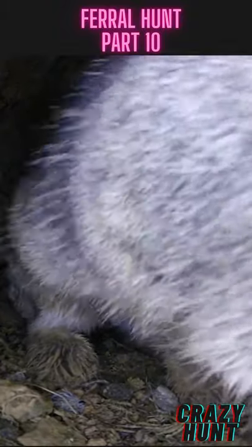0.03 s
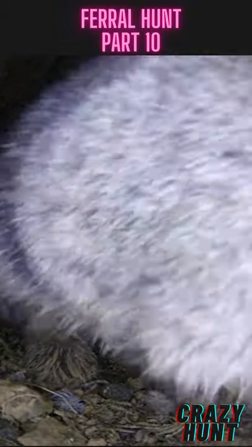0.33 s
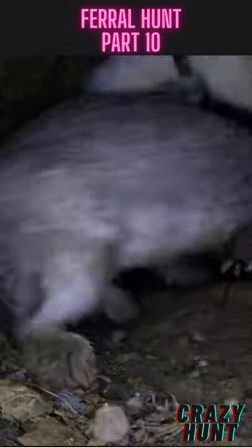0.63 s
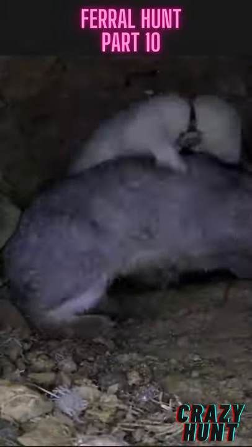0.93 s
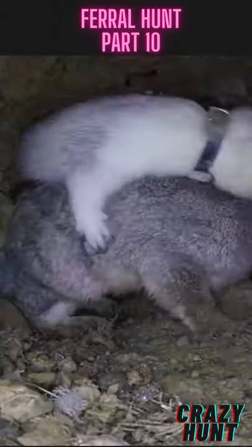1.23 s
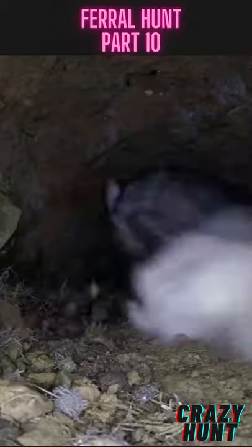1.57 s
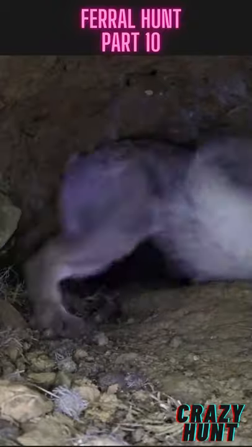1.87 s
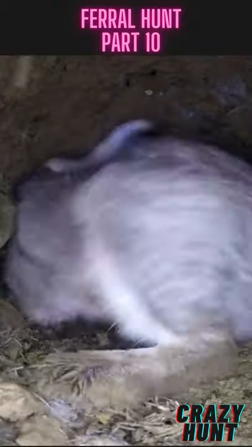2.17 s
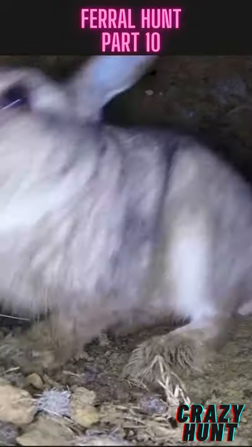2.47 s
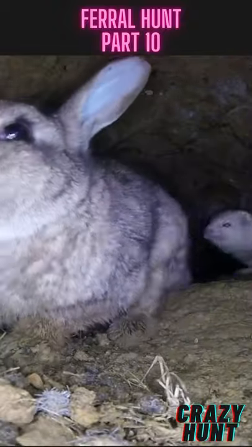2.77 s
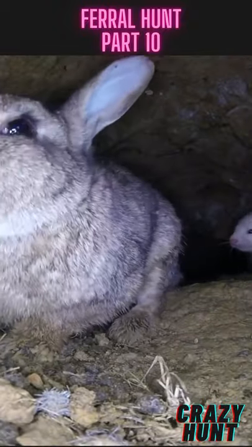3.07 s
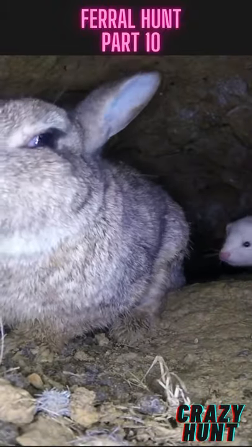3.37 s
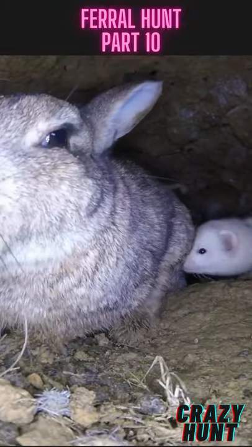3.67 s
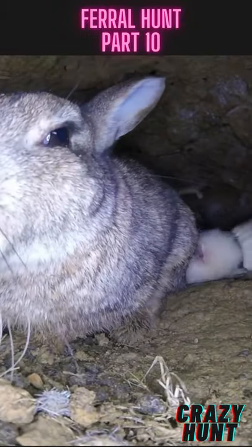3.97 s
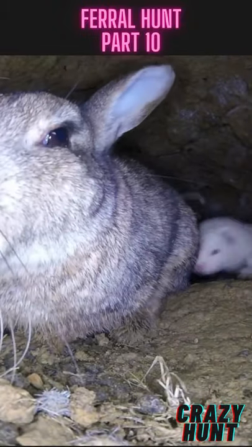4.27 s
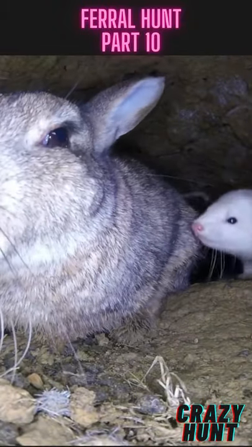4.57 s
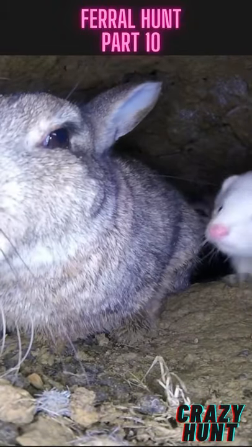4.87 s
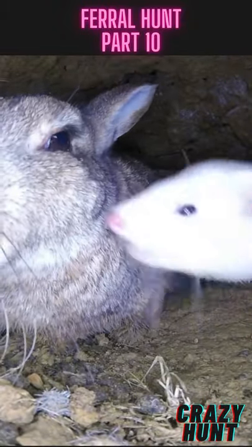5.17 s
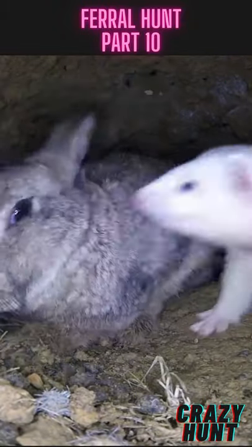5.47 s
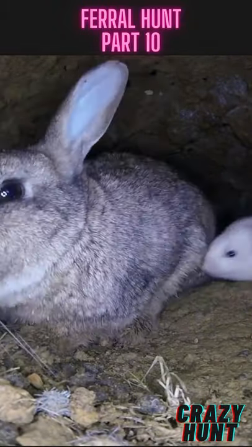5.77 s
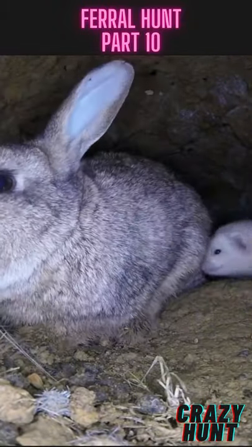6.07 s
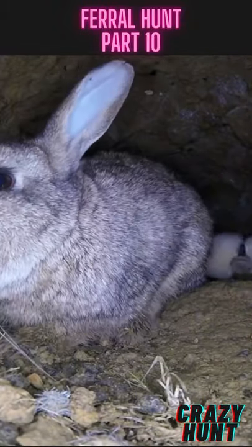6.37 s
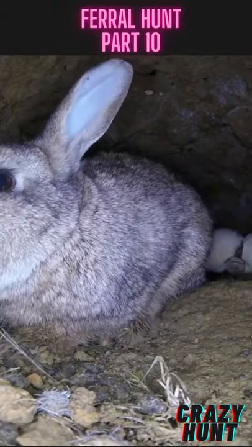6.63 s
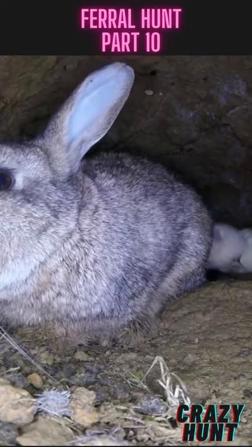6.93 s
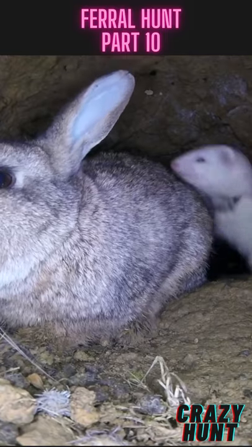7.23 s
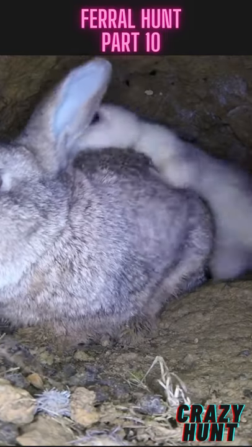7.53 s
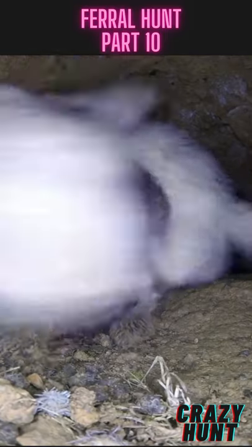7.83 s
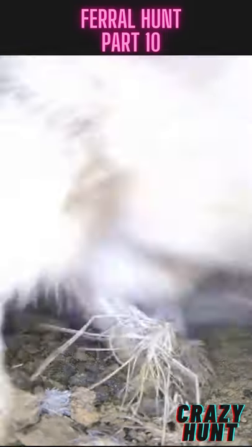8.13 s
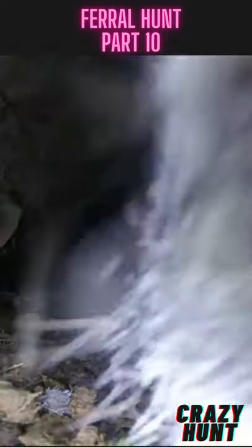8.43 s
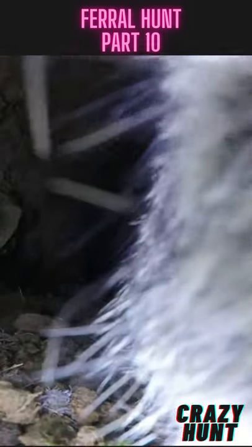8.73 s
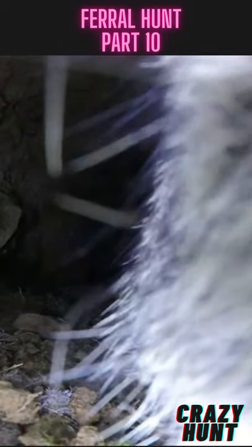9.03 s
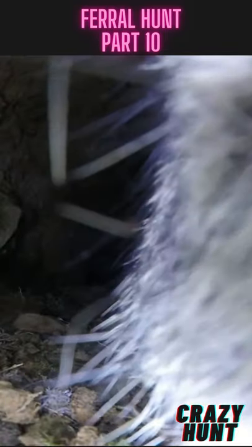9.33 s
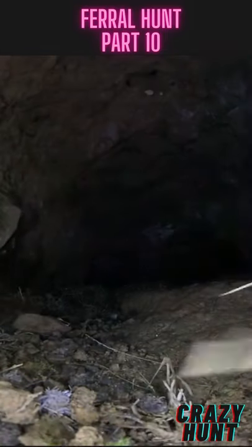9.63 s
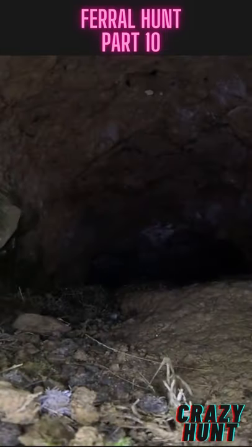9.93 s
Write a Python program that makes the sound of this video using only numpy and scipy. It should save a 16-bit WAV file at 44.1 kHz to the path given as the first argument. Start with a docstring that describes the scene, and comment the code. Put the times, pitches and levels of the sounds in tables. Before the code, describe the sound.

Two animals scuffle in an earth burrow, with close dull thumps, sharp knocks and gritty scrapes, pausing midway over a low rumble.

```python
"""Scuffle in a burrow

A ferret and a rabbit scuffle in an earth burrow, right beside a small camera. Feet and bodies thud on
the soil, claws and pebbles click, and bumps set the hollow case ringing. Friction makes grit scrape and
fur swish over the microphone. In the lull come faint sniffs, and the ferret noses about with two squeaks.
Under it all lie a low rumble, a faint hum and hiss."""
import sys
import numpy as np
from scipy import signal
from scipy.fft import rfft, irfft
from scipy.io import wavfile

SR = 44100
rng = np.random.default_rng(int(sys.argv[2]) if len(sys.argv) > 2 else 0)


def dump_mix(stems):
    """Bounce the given channels to the path in sys.argv[1] as a 16-bit WAV at rate SR."""
    frames = np.atleast_2d(stems).T  # one column per channel
    limited = np.clip(frames, -1, 1)  # hard clip at full scale
    pcm = np.round(limited * 32767).astype(np.int16)
    wavfile.write(sys.argv[1], SR, pcm)


N = 441000
TIME = np.arange(N) / SR

# how hard the animals move, as the level of the shaking ground: time_s, level_db
EFFORT = [(0.0, -46.5), (0.47, -44.5), (0.7, -36.5), (1.31, -42), (1.67, -38.5), (2.03, -35), (2.3, -39.5),
          (2.45, -49.5), (2.7, -49), (3.2, -55), (5.18, -52), (5.48, -46.5), (7.04, -53.5), (7.5, -49),
          (7.75, -42.5), (7.9, -41.5), (8.02, -29), (8.17, -36.5), (8.28, -45.5), (8.42, -42), (8.66, -53),
          (8.91, -55.5), (9.11, -51.5), (9.78, -51.5), (10.0, -54.5)]
# spectrum of scraped grit: frequency_hz, gain_db
GRIT_SPECTRUM = [(100, -18.5), (300, 15.5), (700, 6.5), (1400, 3.5), (2500, -0.5), (2900, 0.5), (3300, 0),
                 (4000, -0.5), (5600, -2), (6500, 3), (7500, -7), (10000, -16), (14000, -27)]


def amp(db):
    """Amplitude grows tenfold for every 20 decibels."""
    return 10 ** (np.asarray(db) / 20)


def unit(x):
    """Normalisation to an rms of 1."""
    return x / np.sqrt(np.mean(x ** 2) + 1e-20)


def level(curve):
    """An amplitude envelope, interpolated in decibels from rows of time_s, level_db."""
    return amp(np.interp(TIME, *np.transpose(curve)))


def add(mix, start_s, sound):
    """Superposition: a sound sums into the mix from its start time."""
    part = mix[max(round(start_s * SR), 0):][:len(sound)]
    part += sound[:len(part)]


def coloured(x, spectrum):
    """Spectral shaping by rows of frequency_hz, gain_db, at rms 1."""
    hz, db = np.transpose(spectrum)
    bins = np.fft.rfftfreq(len(x), 1 / SR)
    gain = amp(np.interp(np.log(bins + 1), np.log(hz), db))
    return unit(irfft(rfft(x) * gain, len(x)))


def drift(rate_hz):
    """Random modulation: noise low-passed near the given rate, at rms 1."""
    bins = np.fft.rfftfreq(N, 1 / SR)
    return unit(irfft(rfft(rng.standard_normal(N)) * np.exp(-(bins / rate_hz) ** 2), N))


def contact(hz, octaves, size=2048):
    """An impact as a minimum-phase pulse, its energy in a hump around hz."""
    bins = abs(np.fft.fftfreq(size, 1 / SR)) + 1
    distance = np.log2(bins / hz) / max(octaves, .1)
    log_gain = np.maximum(2 - 2 * np.sqrt(1 + distance ** 2 / 2), -11)
    spectrum = np.exp(np.conj(signal.hilbert(log_gain)))
    return np.fft.ifft(spectrum).real[:size // 2]


def excite(force, response):
    """A linear system convolves the force with its impulse response; scaled to rms 1."""
    return unit(signal.fftconvolve(force, response)[:len(force)])


def damped_modes(modes, t):
    """Free vibration: one exponentially decaying sinusoid for each mode."""
    return [amp(db - 60 * t / t60) * np.sin(2 * np.pi * hz * t) for hz, db, t60 in modes]


def resonate(x, hz, width_hz):
    """A steep resonance whose centre follows the curve hz, at rms 1."""
    carrier = np.exp(2j * np.pi * np.cumsum(hz) / SR)
    pole = np.exp(-np.pi * width_hz / SR)
    baseband = signal.lfilter([1], np.poly([pole, pole]), x / carrier)
    return unit((carrier * baseband).real)


def background(hiss_db=-57.5, waver_rad=0.2):
    """Hiss coloured by the microphone's narrow resonance, and a faint phase-modulated hum."""
    # frequency_hz, gain_db
    hiss_spectrum = [(100, 8.5), (330, 14), (600, 6.5), (1200, 4), (2000, 0.5), (3200, -4), (4500, -14),
                     (5900, -9), (6480, 8), (7100, 0.5), (8800, -2.5), (10300, -11), (12000, -7.5),
                     (14000, -18)]
    # frequency_hz, level_db
    hum_partials = [(724, -78), (844.6, -75), (965.2, -80), (1206.3, -84)]
    # both sink after the heaviest blows and creep back: time_s, gain_db
    dips = [(0, -0.5), (1.59, -2.5), (1.65, -11.5), (2.9, -9), (4.2, -4.5), (5.6, -3), (7.95, -2),
            (8.15, -5.5), (8.3, -12), (9.0, -9), (10, -6)]
    hiss = amp(hiss_db) * coloured(rng.standard_normal(N), hiss_spectrum)
    hum = sum(amp(db) * np.sqrt(2) * np.sin(2 * np.pi * hz * TIME + waver_rad * drift(4))
              for hz, db in hum_partials)
    return (hiss + hum) * level(dips)


def rumble(gain_db=3, lump_db=2.5, lump_hz=6.5):
    """Forced vibration: shifting weight shakes the ground in uneven lumps."""
    # frequency_hz, gain_db
    ground_spectrum = [(15, -9.5), (30, 6.5), (58, 4), (90, -6.5), (140, -6.5), (200, -16), (320, -28),
                       (500, -38.5), (1200, -54.5), (4000, -82.5)]
    shaking = coloured(rng.standard_normal(N), ground_spectrum)
    return shaking * level(EFFORT) * amp(gain_db + lump_db * drift(lump_hz))


def nosing(start_s=4.95, length_s=1.55, level_db=-67.5, band_hz=(1040, 1320)):
    """Narrow-band noise swells once while the ferret noses about."""
    swell = np.zeros(N)
    add(swell, start_s, amp(level_db) * signal.windows.hann(int(length_s * SR)))
    bandpass = signal.butter(2, band_hz, "bandpass", fs=SR, output="sos")
    return swell * unit(signal.sosfilt(bandpass, rng.standard_normal(N)))


def sniffing(grain_db=3, grain_hz=150):
    """An animal sniffs: faint, short puffs of breath noise, made grainy by amplitude modulation."""
    # start_s, length_s, level_db
    sniffs = [(3.47, 0.088, -77), (3.759, .11, -72), (4.078, 0.085, -71), (4.387, 0.11, -69),
              (4.64, 0.15, -68), (4.99, 0.057, -69.5), (5.924, .11, -71), (6.145, 0.082, -67),
              (6.272, 0.086, -72), (7.187, .08, -71)]
    # frequency_hz, gain_db
    sniff_spectrum = [(500, -16), (1500, -14), (2500, -2), (3400, 1.5), (4300, -2), (5500, -6), (8000, -16),
                      (14000, -33)]
    swell = np.zeros(N)
    for start_s, length_s, db in sniffs:
        add(swell, start_s, amp(db) * signal.windows.hann(int(length_s * SR)))
    breath = coloured(rng.standard_normal(N), sniff_spectrum)
    return swell * breath * unit(amp(grain_db * drift(grain_hz)))


def squeaks(arch=0.07, width_hz=520):
    """The ferret's rough squeaks: a noise-driven resonance arches up in pitch and eases back."""
    # start_s, length_s, top_pitch_hz, level_db
    calls = [(5.385, 0.044, 5100, -63), (6.533, 0.03, 5200, -70)]
    out = np.zeros(N)
    for start_s, length_s, top_hz, db in calls:
        progress = np.linspace(0, 1, int(length_s * SR))
        pitch = top_hz * (1 - arch * (1 - np.sin(np.pi * progress * 3 / 4)))
        noise = rng.standard_normal(SR)[:len(progress)]
        add(out, start_s, amp(db) * np.sin(np.pi * progress) * resonate(noise, pitch, width_hz))
    return out


def fur(flutter_db=2, flutter_hz=73):
    """Friction noise: countless hairs slide over the microphone and sum to a soft swish."""
    # start_s, length_s, level_db
    sweeps = [(8.351, 0.064, -38), (8.391, 0.19, -45.5), (9.474, 0.28, -48.5)]
    # frequency_hz, gain_db
    fur_spectrum = [(100, 22), (300, 8.5), (700, 6), (1100, 3.5), (1700, 3), (2500, -6), (4000, -9),
                    (6500, -11.5), (9000, -19), (14000, -47)]
    stroke = np.zeros(N)
    for start_s, length_s, db in sweeps:
        add(stroke, start_s, amp(db) * signal.windows.tukey(int(length_s * SR), alpha=0.65))
    swish = coloured(rng.standard_normal(N), fur_spectrum)
    return stroke * swish * amp(-flutter_db * drift(flutter_hz))


def dragging(attack_s=0.021, release_s=0.0054):
    """The envelope of sliding friction: a paw bites into grit, presses on or eases, and stops."""
    # start_s, length_s, midway_level_db, growth_db
    drags = [(0.616, 0.1, -57, -23), (0.735, 0.077, -54.5, -7), (0.83, 0.11, -70, 5), (0.98, 0.19, -63, -1),
             (1.04, 0.036, -63, -6), (1.187, 0.095, -71, -4), (1.339, 0.064, -55, -14),
             (1.423, 0.16, -56.5, 6.5), (1.643, 0.025, -47, -33), (1.707, 0.094, -72, 6),
             (1.991, 0.035, -56.5, -3), (2.042, 0.105, -52.5, -1), (2.145, 0.081, -58, 8),
             (2.229, 0.19, -63.5, -9), (2.414, 0.12, -63.5, -7), (2.55, 0.038, -60, -7.5),
             (2.766, 0.11, -64, -5.5), (5.23, 0.07, -64, 2), (5.4, 0.33, -67.5, -3),
             (5.884, 0.41, -73.5, 9.5), (7.42, 0.1, -64.5, 8), (7.67, 0.057, -58.5, 9),
             (7.925, 0.081, -52, 14.5), (8.011, 0.1, -53.5, -14), (8.075, 0.027, -45, 1),
             (8.103, 0.055, -42, 12.5), (8.2, 0.036, -60, -21), (8.362, 0.16, -54, 5),
             (8.648, 0.089, -66, -5.5)]
    out, t = np.zeros(N), np.arange(SR) / SR
    for start_s, length_s, db, growth_db in drags:
        slide = amp(db + growth_db * (np.minimum(t / length_s, 1) - .5))
        attack = np.minimum(t / attack_s, 1)
        release = np.exp(-np.maximum(t - length_s, 0) / release_s)
        add(out, start_s, slide * attack * release)
    return out


def scrape(grains_per_s=750, size_db=1.5, clump_db=2, clump_hz=35, gain_db=-1.44):
    """Shot noise: grains of soil snap in clumps under the paws, over the smooth rub of fur on earth."""
    sizes = amp(size_db * np.minimum(rng.exponential(1, N), 4)) * rng.choice([-1, 1], N)
    grains = unit(sizes * (rng.random(N) < grains_per_s / SR))
    rub = rng.standard_normal(N)
    force = (grains + rub) * amp(clump_db * drift(clump_hz))
    stirring = amp(-39) * level(EFFORT) ** 0.62  # loose grit stirs all the time, more with effort
    return coloured(force, GRIT_SPECTRUM) * (dragging() + stirring) * amp(gain_db)


def crumbs(snaps_per_s=260, size_count=8, spread_db=7.5, gain_db=-8):
    """A Poisson process: coarse crumbs snap singly under dragging paws, each size at its own pitch."""
    out = np.zeros(N)
    for hz in np.geomspace(1780, 5600, size_count):
        snaps = rng.random(N) < snaps_per_s / size_count / SR
        strength = amp(spread_db * rng.uniform(-1.1, 1, N))
        out += signal.oaconvolve(snaps * strength, unit(contact(hz, octaves=.6)))[:N]
    return amp(gain_db) * coloured(out, GRIT_SPECTRUM) * dragging()


def rasps(stutter_db=4, stutter_hz=260):
    """Stick-slip friction: claws and flanks catch and slip, exciting a resonance that glides."""
    # start_s, length_s, level_db, centre_hz, width_hz, glide_octaves
    slides = [(1.732, 0.16, -59.5, 470, 203, 0.1), (2.043, 0.035, -51.5, 5600, 1100, -.15),
              (2.067, 0.024, -46, 1120, 450, .1), (2.44, 0.047, -61, 4300, 2000, 0.14),
              (2.627, 0.032, -70, 3850, 700, -.1), (6.39, 0.079, -51.5, 258, 200, -0.22),
              (6.419, 0.023, -52, 443, 159, -0.079), (7.929, 0.035, -51, 2780, 603, 0.03),
              (7.952, 0.032, -55, 3200, 1200, .25), (8.128, 0.04, -41, 6500, 1100, .02),
              (8.452, 0.059, -48.5, 1490, 600, .1), (8.49, 0.046, -51, 1530, 300, 0.058),
              (9.53, 0.15, -60.5, 1650, 600, -.1)]
    out = np.zeros(N)
    slips = rng.standard_normal(N) * amp(stutter_db * drift(stutter_hz))
    for start_s, length_s, db, hz, width_hz, glide in slides:
        progress = np.linspace(0, 1, int(length_s * SR))
        force = slips[int(start_s * SR):][:len(progress)]
        band = resonate(force, hz * 2 ** (glide * (progress - .5)), width_hz)
        add(out, start_s, amp(db) * np.sin(np.pi * progress) * band)
    return out


def bumps(rise_s=0.001):
    """Modal ringing: a body bumps the camera's hollow case, which booms under weaker upper modes."""
    # start_s, level_db, upper_modes_db
    hits = [(8.3613, -36, 3), (8.3767, -14.5, -0.5), (8.4083, -23.5, -12)]
    # frequency_hz, gain_db, t60_s
    case_modes = [(246, 2, 0.054), (588, -22, 0.096), (953, -13, .05), (1172, -22, 0.084),
                  (1600, -14.5, 0.029), (1970, -29, .06)]
    out, t = np.zeros(N), np.arange(SR // 5) / SR
    lowest, *upper = damped_modes(case_modes, t)
    rise = 1 - np.exp(-t / rise_s)
    for start_s, db, upper_db in hits:
        add(out, start_s, -amp(db) * rise * (lowest + amp(upper_db) * sum(upper)))
    return out


def knocks(crumble=0.32, shove_db=-11.5, shove_hz=380, wall_db=-12, wall_decay_s=.0025):
    """Impact excitation: claws and pebbles strike, ring, shove the camera and scatter off the walls."""
    # start_s, level_db, centre_hz, spread_octaves, crumble_s, ring_db
    impacts = [(0.535, -44, 990, 0.33, 0.0034, -18), (0.6268, -33.5, 6300, 1.1, 0.00025, -25),
               (0.747, -34.5, 2220, 0.62, 0.0035, -14), (0.7492, -37.5, 420, 0.66, 0.0018, -2),
               (0.8715, -54, 4000, 0.73, .0006, -14), (0.949, -56, 4500, .6, .0006, -14),
               (0.992, -52, 2500, 0.71, 0.0011, -10), (1.061, -51, 4000, 0.89, .002, -12),
               (0.977, -47, 1920, 0.55, 0.0015, -11), (1.022, -51, 5500, .6, .0005, -15),
               (1.04, -43.5, 4070, 0.35, 0.0056, -21), (1.069, -52, 4000, 0.93, 0.0011, -6),
               (1.142, -51, 2800, 1.1, 0.0011, -4), (1.16, -53, 4000, 0.72, 0.00052, -5),
               (1.355, -44, 3200, 1.2, 0.0035, -14), (1.433, -41.5, 1000, 1, 0.0026, -8),
               (1.4655, -46.5, 3000, 1.7, 0.00087, -6), (1.55, -58, 3000, 1, .002, -12),
               (1.576, -53, 3000, 0.71, 0.0033, -12), (1.601, -48, 2200, 1.6, 0.00052, -9),
               (1.646, -45.5, 4000, 0.58, 0.00083, -17), (1.651, -21, 168, 0.47, 0.0057, -18),
               (1.6532, -33, 960, 0.25, 0.004, -8), (1.745, -52.5, 4800, .8, 0.00042, -17),
               (1.788, -36.5, 240, 0.38, 0.0035, -16), (1.884, -41, 257, 0.45, .002, -20),
               (1.9516, -42.5, 4860, 1, 0.0037, -19), (1.952, -37, 342, 0.4, 0.0039, -13),
               (2.051, -46, 2500, 0.28, 0.01, -11), (2.0745, -42, 1200, .9, 0.0011, -10),
               (2.087, -22, 477, 0.89, 0.003, -20), (2.0902, -30.5, 1330, 0.4, 0.0012, -10),
               (2.106, -49, 1500, 1.3, 0.0012, -4), (2.1093, -18.5, 555, 0.53, 0.0015, -10),
               (2.111, -31, 1290, 0.53, .0015, -10), (2.141, -48, 2800, 1, .002, -7),
               (2.164, -52, 2200, 0.78, 0.00089, -8), (2.1905, -28, 5100, 0.13, 0.00026, -28),
               (2.191, -48, 11000, 1.5, .0002, -25), (2.2108, -38, 3300, 1.1, 0.0067, -10),
               (2.257, -56, 5500, 1.2, .0006, -9), (2.5371, -10.5, 1820, 0.39, 0.00057, 1.5),
               (2.5376, -22, 6020, 0.26, 0.0004, -7.5), (2.5371, -25.5, 600, 0.67, 0.00044, -20),
               (2.538, -27, 2800, 0.11, 0.003, 1.5), (2.541, -34.5, 3960, 0.3, 0.0028, -8),
               (2.563, -30, 400, 0.63, 0.00053, -10.5), (2.68, -65, 2940, 0.47, 0.00072, -6),
               (2.737, -60, 1600, 0.6, .0006, -10), (2.778, -57, 3200, 1.2, 0.0022, -17.5),
               (5.715, -54, 2800, 1.5, 0.0011, -15.5), (5.604, -41.5, 1200, 1.5, 0.0031, -8),
               (5.819, -42.5, 241, 0.4, 0.0015, -17), (5.929, -54.5, 3870, 0.3, .0012, -15),
               (6.058, -49, 2400, 0.78, 0.0025, -18), (6.53, -39, 267, 0.45, 0.0021, -14),
               (7.313, -50.5, 2900, 1.2, 0.0018, -1), (7.793, -39, 167, .45, .004, -24),
               (7.92, -43, 2200, 0.77, .001, -1), (7.996, -33.5, 5560, 0.3, 0.00089, -23),
               (8.008, -31.5, 505, 0.37, 0.0056, -10), (8.112, -21, 355, 0.32, 0.0014, -40),
               (8.132, -21, 227, 0.41, .003, -24), (8.151, -26.5, 238, 0.31, 0.0023, -22),
               (8.1933, -15.5, 4400, 0.46, 0.0002, -18.5), (8.1934, -17, 1200, 0.8, 0.0009, -8),
               (8.192, -40, 12000, 0.48, .0002, -30), (8.215, -50, 4900, 0.18, .0006, -20),
               (8.238, -64, 4000, 0.8, 0.00085, -12.5), (8.276, -59, 6500, 1, 0.0013, -13),
               (8.363, -43, 1080, 0.52, 0.0043, -2.5), (8.377, -33, 1340, 0.6, 0.0017, -3),
               (9.13, -59, 2800, 0.83, .001, -8), (9.1999, -28.5, 4140, 1.24, 0.0018, -20),
               (9.289, -55, 2500, 0.62, 0.0016, -9), (9.7802, -49.5, 2310, 1.3, 0.0067, 0.5)]
    # modes that every knock excites: frequency_hz, gain_db, t60_s
    ring_modes = [(598, -14, .07), (940, -6, .05), (1190, -7, .044), (1420, -7, .02), (1700, -1, .02),
                  (2020, 1, .022), (2660, -4, .026), (2820, -2, .03), (3330, -13, .03), (3830, -12, .022),
                  (4926, -4, .018), (5730, -11, .024), (6450, -12, .025)]
    out, t = np.zeros(N), np.arange(SR // 12) / SR
    ring = sum(damped_modes(ring_modes, t))
    energy_scale = np.sqrt(.002 / t[-1])  # a knock's level counts its energy as packed into 2 ms
    for start_s, db, hz, octaves, crumble_s, ring_db in impacts:
        force = crumble * rng.standard_normal(len(t)) * np.exp(-t / crumble_s)
        force[0] = 1  # one sharp contact leads the crumble of lesser ones
        direct = excite(force, contact(hz, octaves))
        ringing = amp(ring_db) * excite(direct, ring)
        shove = amp(shove_db) * excite(force, contact(shove_hz, octaves=0.51))
        walls = rng.standard_normal(len(t)) * np.exp(-t / wall_decay_s)
        scatter = amp(wall_db) * excite(direct, walls)
        add(out, start_s, amp(db) * energy_scale * unit(direct + scatter + ringing + shove))
    # the microphone's port resonates and dulls what lies above
    port = amp(3) * signal.lfilter(*signal.iirpeak(6450, Q=16, fs=SR), out)
    return signal.sosfilt(signal.butter(2, 7000, fs=SR, output="sos"), out + port)


def thump(hz, damping, crush_db=-28.5, crush_decay_s=0.011, heave_db=-14.5, heave_hz=27.3, heave_s=0.092):
    """A heavily damped oscillation: soil yields and springs back, with a brief crush and a slow heave."""
    t = np.arange(SR // 5) / SR
    cycles, crest = hz * t, 3 / 4  # the swell peaks three quarters of a cycle after first touch
    swell = (cycles / crest * np.exp(1 - cycles / crest)) ** damping
    out = -swell * np.sin(2 * np.pi * cycles)
    crush = excite(rng.standard_normal(len(t)), contact(hz=235, octaves=0.55))
    add(out, .5 / hz, amp(crush_db) * crush * np.exp(-t / crush_decay_s))
    heave = np.sin(np.pi * np.minimum(t / heave_s, 1)) ** 2 * np.sin(2 * np.pi * heave_hz * t)
    return out + amp(heave_db) * heave


def steps(steps_per_s=6, gain_db=1.5, spread_db=3, pitch_hz=70.6, spread_octaves=0.64):
    """Light impacts: paws patter at uneven intervals, harder as the effort grows."""
    out, start_s = np.zeros(N), 0
    for gap, size, detune in rng.uniform(-1, 1, (100, 3)):
        start_s += (1 + gap / 2) / steps_per_s
        step = thump(pitch_hz * 2 ** (spread_octaves * detune), damping=9.1)
        add(out, start_s, amp(gain_db + spread_db * size) * step)
    return out * level(EFFORT)


def landings(lead_cycles=0.6):
    """Heavy impacts: feet and bodies drive the soft soil into brief low-frequency pulses."""
    # each blow peaks close to its time: time_s, peak_db, pitch_hz
    blows = [(0.204, -26, 48.4), (0.628, -20, 45.6), (0.644, -30.5, 142), (0.663, -22.5, 62.6),
             (0.702, -28, 65), (0.76, -22.5, 92), (0.914, -14.5, 59), (0.93, -23.5, 133),
             (0.975, -30.5, 62), (1.062, -22, 65.4), (1.11, -31, 69.5), (1.237, -27, 54), (1.435, -18, 103),
             (1.488, -22.5, 102), (1.53, -28, 70), (1.569, -23, 51.5), (1.644, -5, 45.4), (1.721, -36, 55),
             (1.784, -21.5, 63), (1.89, -21.5, 58.6), (1.969, -32, 81), (2.026, -24, 78),
             (2.064, -19.5, 68.4), (2.0907, -16, 148), (2.113, -15.5, 57.4), (2.117, -22.5, 194),
             (2.153, -31, 70), (2.233, -23.5, 65), (2.37, -37, 59.4), (2.538, -23.5, 91),
             (2.812, -22, 46.3), (2.831, -35, 150), (3.62, -46.5, 55), (4.782, -37, 56),
             (5.607, -28.5, 83.5), (5.699, -38, 65.4), (5.824, -33, 86), (6.264, -33, 56),
             (6.429, -31.5, 125), (6.988, -35.5, 65), (7.434, -33, 59.7), (7.524, -26.5, 63.3),
             (7.605, -33, 92), (7.678, -29, 57.6), (7.794, -18, 78), (8.011, -14.5, 114),
             (8.035, -16.5, 75.6), (8.065, -4.5, 67.4), (8.119, -9.5, 90), (8.148, -14.5, 81),
             (8.199, -26.5, 129), (8.385, -15.5, 66), (8.416, -20.5, 62), (8.47, -25, 40),
             (8.506, -31, 42.3), (9.069, -30, 55), (9.098, -25, 50.2), (9.126, -26, 38.7),
             (9.169, -24, 37.2), (9.21, -27, 43.4), (9.253, -25.5, 39.9)]
    out = np.zeros(N)
    for time_s, db, hz in blows:
        add(out, time_s - lead_cycles / hz, amp(db) * thump(hz, damping=4))
    return out


def scene():
    """Absorption: earth walls leave no lasting echo, so the sources sum close and dry."""
    ground = landings() + steps() + rumble()
    friction = scrape() + crumbs() + rasps() + fur()
    mix = ground + friction + sniffing() + knocks() + bumps() + squeaks() + nosing() + background()
    return mix[None]


def record(dry):
    """Band limiting: the camera cuts off the highest treble."""
    lowpass = signal.firwin(511, cutoff=14450, window=("kaiser", 9), fs=SR)
    return signal.oaconvolve(dry, lowpass[None], "same")


dry = scene()
out = record(dry)
dump_mix(out)
```